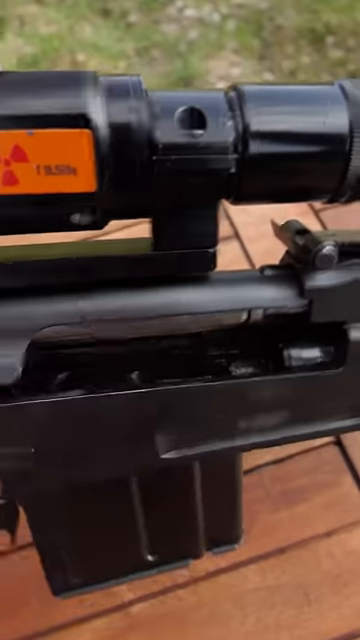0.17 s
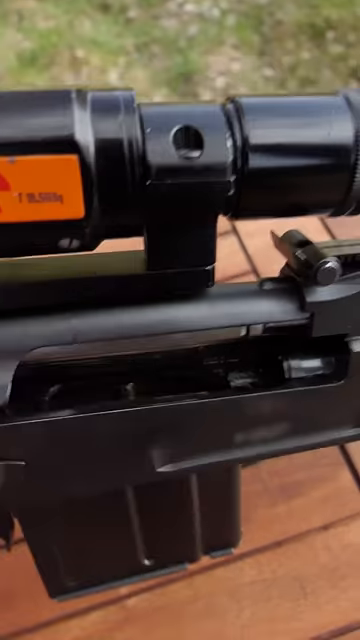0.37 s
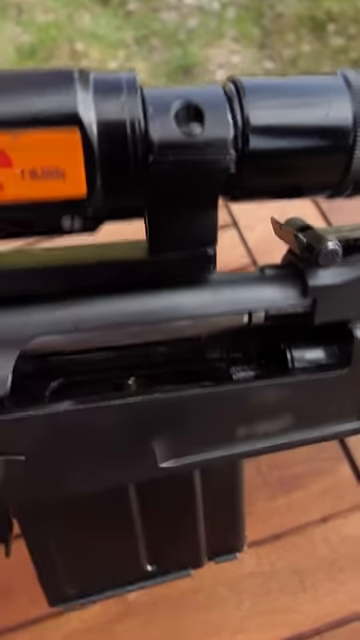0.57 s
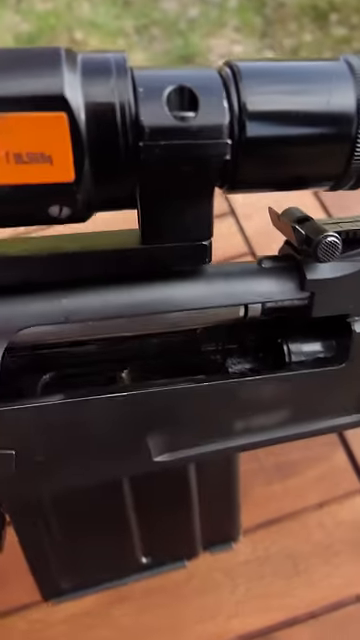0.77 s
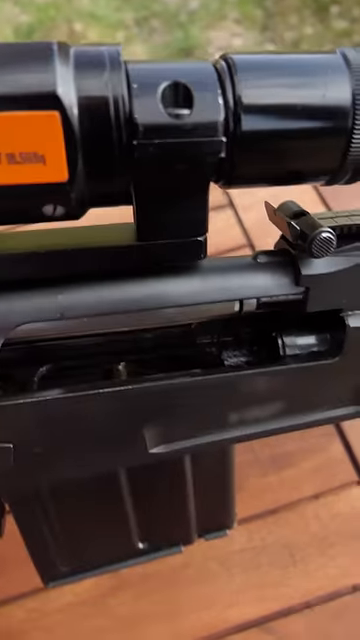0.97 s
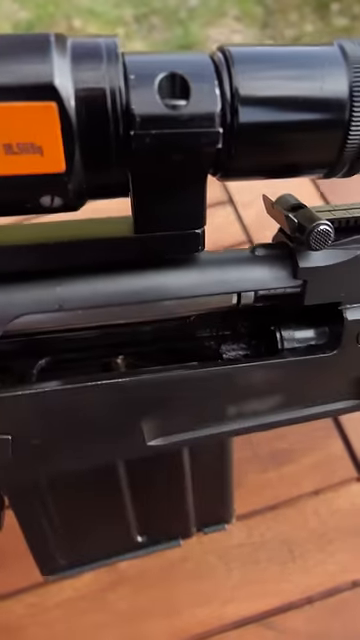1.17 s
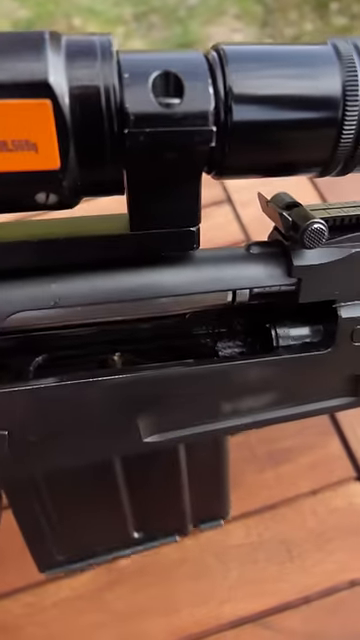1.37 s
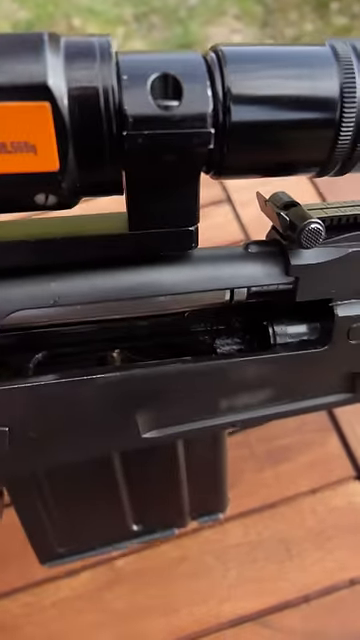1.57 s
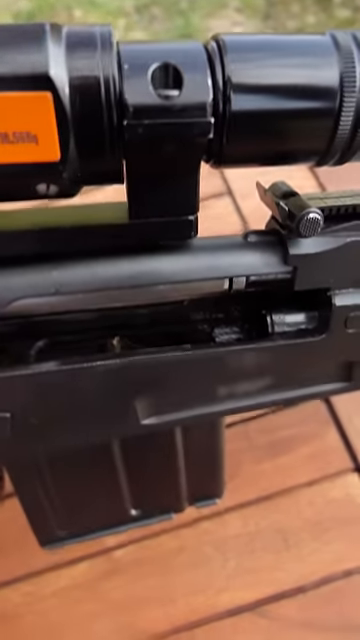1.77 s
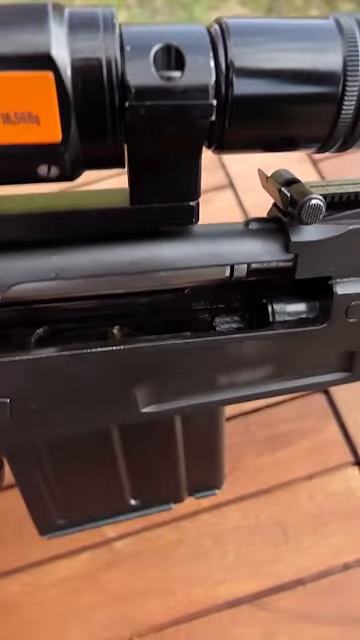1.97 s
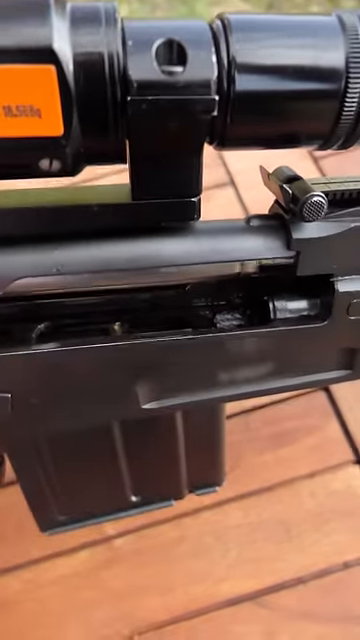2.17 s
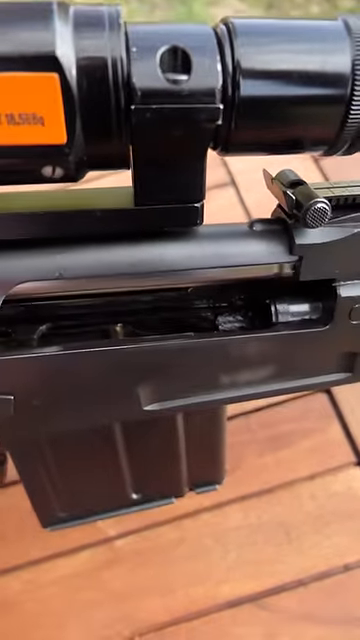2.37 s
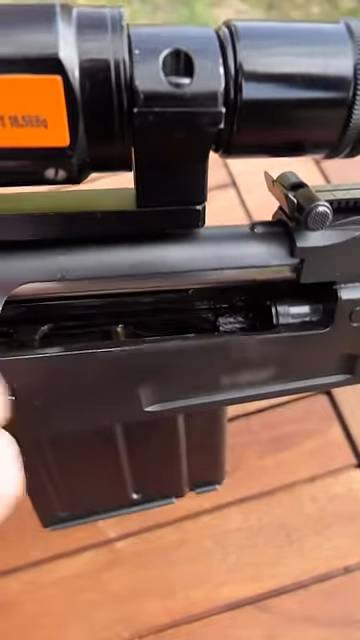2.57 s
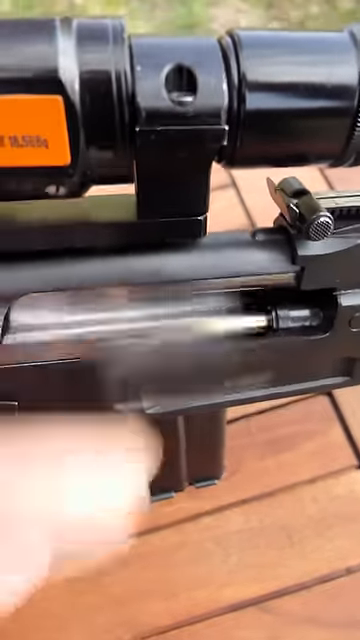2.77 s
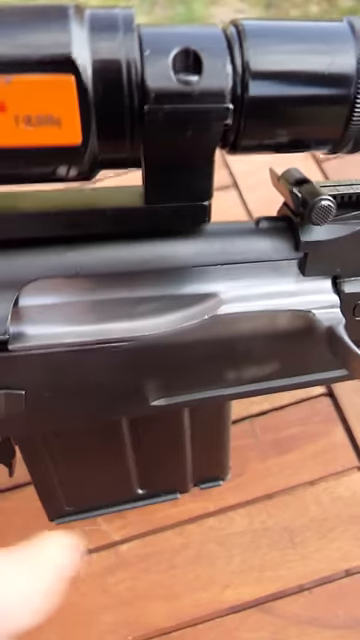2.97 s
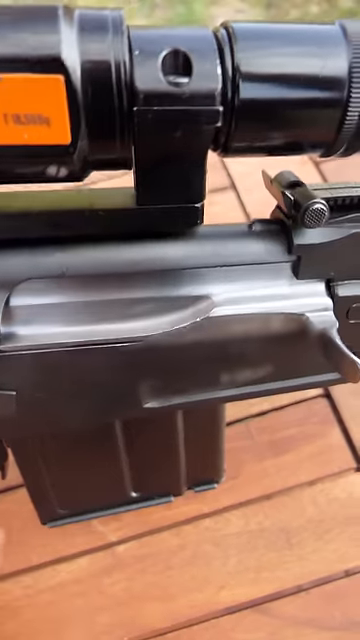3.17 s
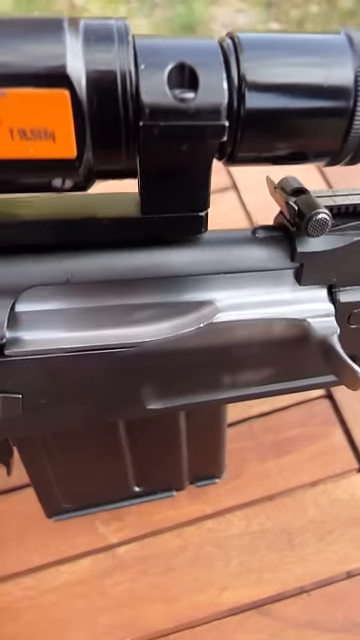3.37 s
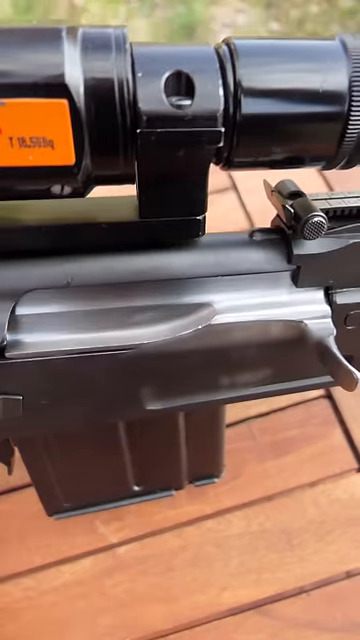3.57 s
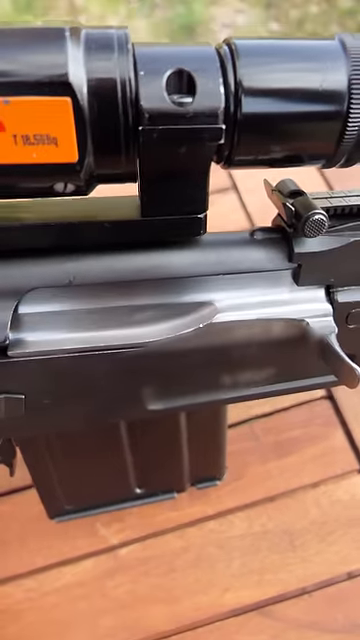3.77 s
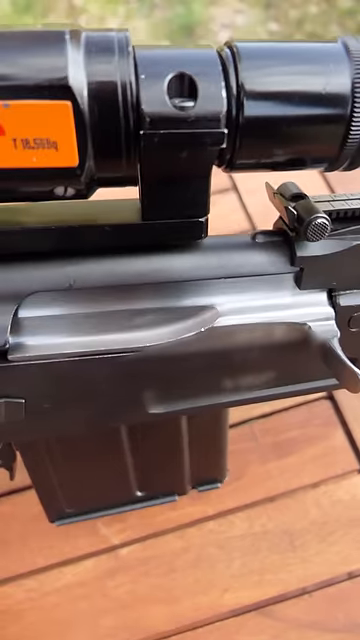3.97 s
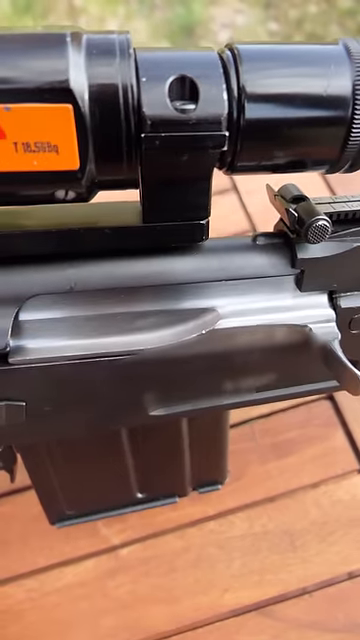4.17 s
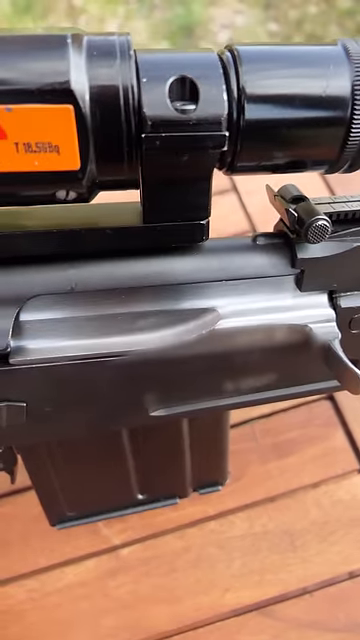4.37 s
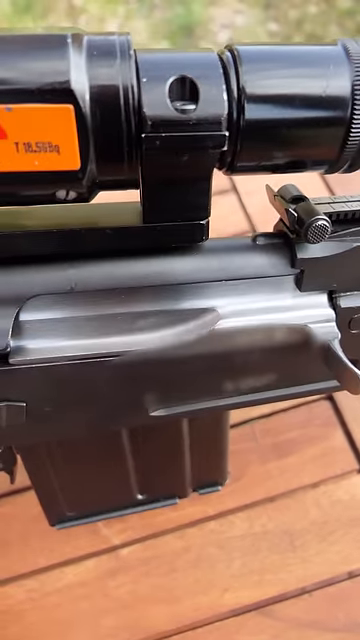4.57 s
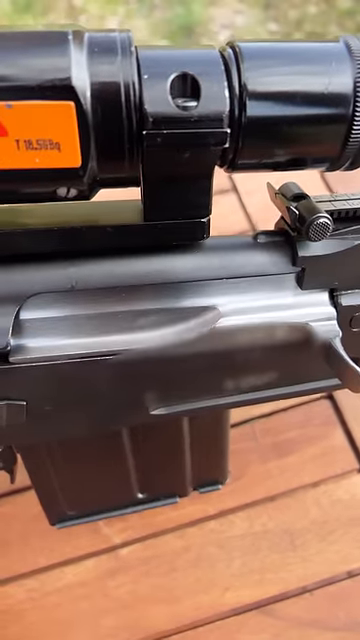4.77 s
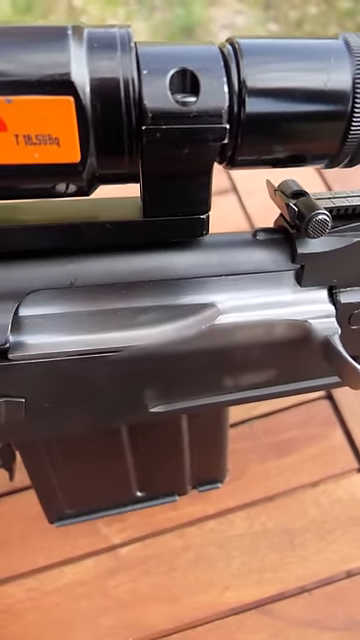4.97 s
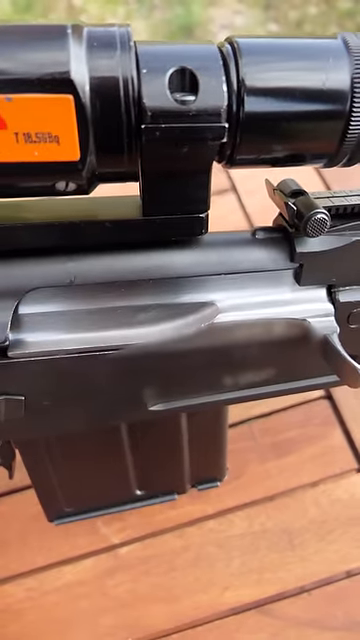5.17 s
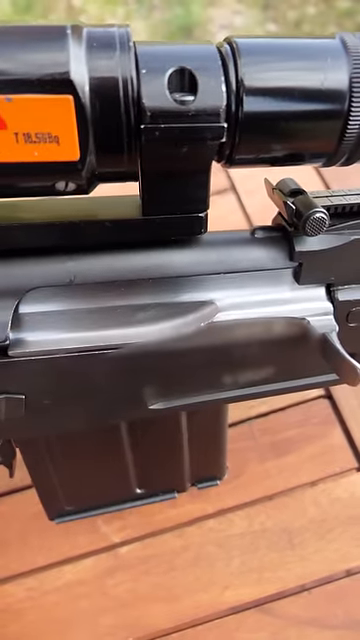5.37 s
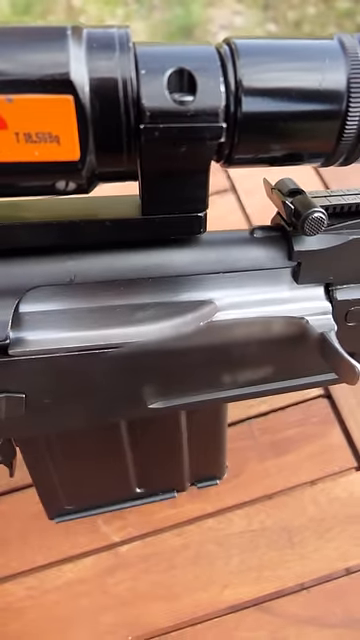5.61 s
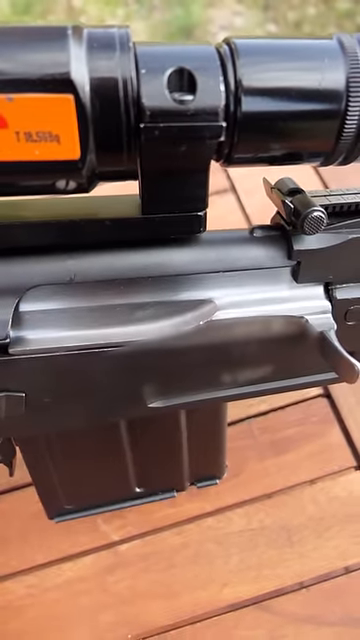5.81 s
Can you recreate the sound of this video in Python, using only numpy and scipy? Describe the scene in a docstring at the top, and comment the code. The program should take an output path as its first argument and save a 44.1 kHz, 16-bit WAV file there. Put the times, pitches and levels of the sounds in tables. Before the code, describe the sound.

Close steel scraping and a hard clack, a quiet pause, then a bolt rasps forward, chambers a round and bangs closed.

```python
"""A rifle bolt scrapes and slams close by, the rifle lying on a wooden garden table: drawn back against
the stop, later gripped and let go, it rubs over the magazine, strips a cartridge and slams shut.
Contacts are noise bursts plus receiver modes; rubbing is random slips through resonances; brass pings,
carrier, frame and table are fading modes. Two spring modes sing on faintly, over a weak scattered echo,
a light breeze and low swells of coloured noise, and a far bird and one faint blip of gliding sines."""
import sys
import numpy as np
from scipy import signal
from scipy.fft import rfft, irfft, next_fast_len
from scipy.io import wavfile
from scipy.ndimage import uniform_filter1d, minimum_filter1d, map_coordinates

SR = 44100
rng = np.random.default_rng(int(sys.argv[2]) if len(sys.argv) > 2 else 0)


def generate_wav(signal):
    """Clip the signal to [-1, 1] and save it as 16-bit WAV at the path in sys.argv[1]."""
    frames = np.transpose(np.atleast_2d(signal))
    scaled = np.clip(frames, -1, 1) * 32767
    pcm = np.round(scaled).astype(np.int16)
    wavfile.write(sys.argv[1], SR, pcm)


N = 257632
TIME = np.arange(N) / SR


def amp(db):
    """Decibels to amplitude."""
    return 10 ** (np.asarray(db) / 20)


def unit(x):
    """Scale to rms 1."""
    return x / np.sqrt(np.mean(x ** 2) + 1e-20)


def along(points, hz):
    """Interpolate (f/Hz, value) points on a log frequency axis."""
    f, value = np.transpose(points)
    return np.interp(np.log(hz + 1), np.log(f + 1), value)


def curves(rows):
    """One value per sample for each column after the time."""
    s, *columns = np.transpose(rows)
    return [np.interp(TIME, s, column) for column in columns]


def during(rows):
    """1 while a curve lasts, with soft ends."""
    to_nearest_end = np.minimum(TIME - rows[0][0], rows[-1][0] - TIME)
    return np.clip(to_nearest_end / 0.0027, 0, 1)


def wobble(knots_per_s):
    """Random curve, linear between normal knots."""
    knots = rng.standard_normal(int(N * knots_per_s / SR) + 4)
    return map_coordinates(knots, [TIME * knots_per_s], order=1)


def filtered(x, response):
    """Apply a complex response of frequency."""
    size = next_fast_len(len(x) + 8192)
    spectrum = rfft(x, size) * response(np.fft.rfftfreq(size, 1 / SR))
    return irfft(spectrum, size)[:len(x)]


def noise(spectrum, size):
    """Coloured noise of rms 1."""
    return unit(filtered(rng.standard_normal(size), lambda hz: amp(along(spectrum, hz))))


def ring(modes, t, scatter_db):
    """Sum of fading sines, at new random strengths and phases for every blow."""
    out = 0
    for hz, db, t60 in modes:
        level = amp(db + scatter_db * rng.normal() - 60 * t / t60)
        out = out + level * np.sin(2 * np.pi * (hz * t + rng.random()))
    return out


def add(track, s, x):
    """Mix x into the track at s seconds."""
    part = track[max(round(s * SR), 0):][:len(x)]
    part += x[:len(part)]


def struck(events, modes):
    """A part rings freely after each (t/s, level/dB) blow."""
    out, t = np.zeros(N), np.arange(SR) / SR
    onset = 1 - np.exp(-t / 0.0015)
    for s, db in events:
        add(out, s, amp(db) * ring(modes, t, scatter_db=0.5) * onset)
    return out


# breeze level before its swing: [t/s, level/dB]
BREEZE_LEVEL = [(0, -63), (1.0, -62), (1.3, -65), (3.5, -67.5), (4.8, -63.5), (5.2, -58), (5.84, -58)]
# breeze spectrum: [f/Hz, relative density/dB]
BREEZE_SPECTRUM = [(24, -39.5), (40, -10), (70, 1), (108, -1.5), (193, -2.5), (293, -5), (368, -4),
                   (521, -7.5), (643, -5), (850, -13.5), (1210, -13.5), (1620, -26), (2600, -35.5),
                   (3380, -59.5), (5720, -120)]
# low rumbling swells at the microphone, from wind or handling: [t/s, level/dB]
LOW_SWELLS = [(0.72, -53.5), (2.5, -49.5)]
# low rumble spectrum: [f/Hz, relative density/dB]
RUMBLE_SPECTRUM = [(10, -4.5), (28, -1.5), (45, -15), (90, -31), (200, -70)]
# hiss spectrum: [f/Hz, relative density/dB]
HISS_SPECTRUM = [(300, -23), (1500, 2), (4000, -4), (7000, -10.5)]
BREEZE_SWING_DB, BREEZE_KNOTS_PER_S = 1.8, 6
LOW_SWELL_HALF_S, LOW_FLOOR_DB, HISS_DB = 0.31, -59.5, -72.5  # half-length to 1/e


def air():
    """Unsteady breeze noise, low rumble with swells, steady hiss."""
    breeze_db, = curves(BREEZE_LEVEL)
    breeze_db = breeze_db + BREEZE_SWING_DB * wobble(BREEZE_KNOTS_PER_S)
    breeze = amp(breeze_db) * noise(BREEZE_SPECTRUM, N)
    low_gain = amp(LOW_FLOOR_DB)
    for s, db in LOW_SWELLS:
        low_gain = low_gain + amp(db) * np.exp(-((TIME - s) / LOW_SWELL_HALF_S) ** 2)
    return breeze + low_gain * noise(RUMBLE_SPECTRUM, N) + amp(HISS_DB) * noise(HISS_SPECTRUM, N)


# far bird's whistles, and one faint short knock-like blip at 4.85 s; one list each,
# before waver and blur: [t/s, f/Hz, level/dB]
WHISTLES_AND_BLIP = [
    [(1.88, 1870, -80), (1.96, 1790, -66.5), (1.99, 1517, -71), (2.07, 1230, -64), (2.12, 1270, -65)],
    [(4.36, 1136, -65), (4.43, 1400, -70), (4.54, 1435, -72), (4.62, 1180, -70)],
    [(4.82, 910, -85), (4.855, 889, -57), (4.89, 882, -80)],
    [(5.19, 1555, -68), (5.23, 1360, -66), (5.29, 1115, -78)],
]
PITCH_WAVER = .02  # share of the pitch


def bird_and_blip():
    """Gliding sines, blurred by a random quadrature part."""
    out = np.zeros(N)
    for glide in WHISTLES_AND_BLIP:
        hz, db = curves(glide)
        phase = 2 * np.pi * np.cumsum(hz * (1 + PITCH_WAVER * wobble(35))) / SR
        tone = np.sin(phase) + wobble(100) * np.cos(phase)
        out += during(glide) * amp(db) * tone
    return out


# echo decay: [f/Hz, t60/s]
ECHO_DECAY = [(100, 0.98), (500, 0.95), (2000, 0.44), (7000, .5)]


def garden(x):
    """Fence and shrubs scatter an echo: x through slow-onset noise with decay set by frequency."""
    hz, t, z = signal.stft(rng.standard_normal(SR), SR, nperseg=256)
    decay = amp(-60 * t / along(ECHO_DECAY, hz)[:, None])
    tail = signal.istft(z * decay, SR, nperseg=256)[1]
    tail *= 1 - np.exp(-np.arange(len(tail)) / SR / .015)
    return signal.fftconvolve(x, tail / np.linalg.norm(tail))[:N]


# two close modes of the recoil spring: [f/Hz]
SPRING_MODES_HZ = (3000, 3031)
# slams that set it singing, peak levels: [t/s, lower mode/dB, upper mode/dB]
SPRING_SWELLS = [(0.2, -89, -72), (2.93, -58, -66)]
SING_PEAK_S, SING_SHARPNESS = .9, 3.8  # slam to peak; higher is narrower


def spring():
    """Two recoil-spring modes swell slowly after a slam, beat and fade."""
    out = np.zeros(N)
    for s, *levels_db in SPRING_SWELLS:
        age = np.maximum(TIME - s, 0) / SING_PEAK_S
        swell = (age * np.exp(1 - age)) ** SING_SHARPNESS
        for hz, db in zip(SPRING_MODES_HZ, levels_db):
            out += swell * amp(db) * np.sin(2 * np.pi * hz * TIME + .12 * wobble(40))
    return out


def jolt():
    """The slam pushes air at the microphone, which swings back slowly through its bass cut."""
    since = np.maximum(TIME - 2.9089, 0)

    def hump(peak_s):
        return since / peak_s * np.exp(1 - since / peak_s)

    push = amp(-19.3) * hump(.092) - amp(-11.5) * hump(.011)
    bass_cut = signal.butter(2, .73, 'highpass', fs=SR, output='sos')
    return signal.sosfilt(bass_cut, push)


# rifle kicks the table: [t/s, level/dB]
TABLE_KICKS = [(0.053, -25.5), (0.203, -30.5), (2.33, -37.5), (2.768, -30), (2.909, -22), (2.932, -20),
               (3.004, -35.5)]
# wooden table modes: [f/Hz, relative level/dB, t60/s]
TABLE_MODES = [(67, -3.5, 0.12), (86, -5, 0.21), (105, -1.5, .09), (176, -1.5, 0.14), (235, -3, 0.057)]


def table():
    """Kicked table top sounds its low, short modes."""
    return struck(TABLE_KICKS, TABLE_MODES)


# blow at the rear stop: [t/s, level/dB]
STOP_BLOWS = [(0.204, -41.5)]
# long modes of the whole rifle: [f/Hz, relative level/dB, t60/s]
FRAME_MODES = [(483, 0, 1.0), (3270, -19, 1.05), (6480, -18, .38), (6925, -24, .4)]


def frame():
    """Held open, the whole rifle rings on in long modes."""
    return struck(STOP_BLOWS, FRAME_MODES)


# high brass pings that hold, then stop short: [t/s, level/dB, length/s]
BRASS_PINGS = [(0.225, -42, .14), (0.587, -56, .065), (2.186, -58, .03), (2.473, -39, .08)]
# brass modes: [f/Hz, relative level/dB, t60/s until the stop]
BRASS_MODES = [(3252, 0.5, 0.051), (4743, -5, 0.62)]
STOP_DECAY_S = .006


def brass_pings():
    """High brass pings, each cut off after its length."""
    out, t = np.zeros(N), np.arange(SR // 2) / SR
    onset = 1 - np.exp(-t / 0.0015)
    for s, db, length_s in BRASS_PINGS:
        cutoff = np.exp(-np.maximum(t - length_s, 0) / STOP_DECAY_S)
        add(out, s, amp(db) * ring(BRASS_MODES, t, scatter_db=3.0) * onset * cutoff)
    return out


# bolt travels: [start t/s, swell/s, end t/s, rumble level/dB, scrape level/dB, speed 0-1]
BOLT_STROKES = [(-0.15, 0.23, 0.21, -24.5, -33, .78), (2.12, 0.18, 2.47, -28, -41, .28),
                (2.535, 0.056, 2.63, -31.5, -47.5, 0.2), (2.64, 0.1, 2.9, -24, -26.5, .85)]
SWELL_DB, GRIP_S = 21.5, .03  # growth over the swell; fade-in
RELEASE_DB_PER_S, SCRAPE_GROWS_DB = 269.5, 14  # decay after a stroke; scrape growth over it
CLOSED_S = 2.932  # bolt home
RATTLE_DB, RATTLE_T60_S, SURGE_HZ, SURGE_DB = -36.5, .62, 27, 5


def bolt_speed(s):
    """Stroke speed (0-1) at s seconds, interpolated between strokes."""
    times = [edge for start, _, end, *_ in BOLT_STROKES for edge in (start, end)]
    return np.interp(s, times, np.repeat([stroke[-1] for stroke in BOLT_STROKES], 2))


def rubbing():
    """Rumble and scrape gains: strokes swell, hold, release; coil surges pulse the spring's last rattle."""
    rumble = scrape = 0
    for start, swell, end, rumble_db, scrape_db, _ in BOLT_STROKES:
        swell_db = SWELL_DB * np.clip(1 - (TIME - start) / swell, 0, 1)
        release_db = RELEASE_DB_PER_S * np.maximum(TIME - end, 0)
        gain = np.clip((TIME - start) / GRIP_S, 0, 1) * amp(-swell_db - release_db)
        to_go = np.clip((end - TIME) / (end - start), 0, 1)
        rumble = rumble + gain * amp(rumble_db)
        scrape = scrape + gain * amp(scrape_db - SCRAPE_GROWS_DB * to_go ** 2)
    since = np.maximum(TIME - CLOSED_S, 0)
    surge_db = SURGE_DB * np.cos(2 * np.pi * SURGE_HZ * since)
    rattle = (since > 0) * amp(RATTLE_DB - 60 * since / RATTLE_T60_S - surge_db)
    return rumble, np.hypot(scrape, rattle)


def slips(per_s):
    """Steel catching and slipping: random tiny impacts of uneven size."""
    hits = rng.random(N) < per_s / SR
    return hits * rng.uniform(-1, 1, N) * amp(3 * wobble(110))


# rail resonances, each filter run twice: [f/Hz, width of one pass/Hz, relative level at half speed/dB]
RAIL_RESONANCES = [(84, 70, -15), (228, 83, -3), (337, 110, -5), (480, 140, 0), (664, 230, -3),
                   (742, 220, -5.5), (830, 160, -15), (1180, 190, -11.5)]
# steel slip spectrum: [f/Hz, relative density/dB]
SCRAPE_SPECTRUM = [(500, -34), (1000, -1), (1500, 7.5), (2000, 0.5), (2600, 5.5), (3600, -2.5), (5000, -9),
                   (7000, -36.5)]


def slide():
    """Slips shake the rails and rattle the spring; a faster bolt favours higher resonances."""
    speed = bolt_speed(TIME)
    rub, body, power = slips(per_s=2700), 0, 0
    for fc, width, db in RAIL_RESONANCES:
        gain = amp(db + 11 * (speed - .5) * np.log2(fc / 450))
        resonance = filtered(rub, lambda f: (1j * f * width / (fc * fc - f * f + 1j * f * width)) ** 2)
        body = body + gain * unit(resonance)
        power = power + gain ** 2
    body = body / np.sqrt(power)
    # short steel ring per slip, duller when the bolt creeps
    t = np.arange(SR // 10) / SR
    slip_ring = noise(SCRAPE_SPECTRUM, len(t)) * amp(-60 * t / 0.0073)
    bright = unit(signal.fftconvolve(slips(per_s=800), slip_ring)[:N])
    dull = unit(filtered(bright, lambda hz: 1 / (1 + (hz / 2800) ** 4)))
    brightness = np.clip(2 * speed, 0, 1)
    grit = brightness * bright + (1 - brightness) * dull
    rumble, scrape = rubbing()
    return rumble * body + scrape * grit


# carrier hits a stop or rebounds: [t/s, clack level/dB, body re clack/dB, carrier ring level/dB]
CARRIER_SLAMS = [(0.2015, 3.5, -6, -1), (0.2226, -11, -9.5, 1), (2.6083, -2, -1.5, -13),
                 (2.827, -3, -2.5, -23.5), (2.9083, 1.5, -14, -25.5), (2.9331, -2, -8.5, 0),
                 (3.004, -19, 0.5, -40)]
# carrier modes: [f/Hz, relative level/dB, t60/s]
CARRIER_MODES = [(2360, -9.5, 0.051), (2397, -3, 0.033)]


def carrier():
    """Bolt carrier rings briefly after each slam."""
    return struck([(s, ring_db) for s, _, _, ring_db in CARRIER_SLAMS], CARRIER_MODES)


# bolt catches hammer, magazine lips, cartridge: [t/s, clack level/dB, thud re clack/dB]
BOLT_CATCHES = [(0.0105, -27.5, -5.5), (0.052, -16.5, 0), (0.087, -29, -4), (0.108, -18.5, -5.5),
                (0.1135, -12.5, -11), (0.136, -14.5, -7.5), (0.145, -16.5, -3.5), (0.1636, -11, -10),
                (2.327, -17, 0), (2.354, -22.5, 7), (2.434, -18.5, 0), (2.463, -16, -6.5),
                (2.511, -31.5, -9.5), (2.5853, -14.5, -9.5), (2.636, -28.5, 4), (2.684, -26, -6.5),
                (2.7185, -13.5, -6.5), (2.7662, -13, -1), (2.787, -13, -13.5), (2.7938, -11, -9),
                (2.8013, -7.5, -4.5), (2.8789, -17.5, -12.5)]
# loose parts tick at rest: [t/s, level/dB]
LOOSE_TICKS = [(0.547, -48.5), (0.568, -43.5), (0.585, -48.5), (2.184, -39.5), (3.253, -51), (4.391, -56),
               (4.85, -67), (4.93, -51.5), (5.4555, -40), (5.5047, -49.5), (5.542, -48.5), (5.572, -50)]
SLAM_THUD_DB, SLAM_EDGE_DB, SLAM_RISE_S, SLAM_CHATTER_S = -7, -4.5, .0004, 0.01  # thud re body
CATCH_KNOCK_DB, CATCH_EDGE_DB, CATCH_RISE_S = 1, -13, .0016  # at half speed
KNOCK_DB_PER_SPEED, EDGE_DB_PER_SPEED, CATCH_CHATTER_S = 11, 15.5, 0.013
TICK_THUD_DB, TICK_KNOCK_DB, TICK_EDGE_DB = -2.5, 0.5, -19.5
TICK_RISE_S, TICK_CHATTER_S = .0004, 0.0036


def contacts():
    """Steel contacts: t/s, clack/dB, thud, knock, edge re clack/dB, rise/s, chatter/s; fast is brighter."""
    rows = []
    for s, db, body_db, _ in CARRIER_SLAMS:
        rows.append((s, db, body_db + SLAM_THUD_DB, body_db, SLAM_EDGE_DB, SLAM_RISE_S, SLAM_CHATTER_S))
    for s, db, thud_db in BOLT_CATCHES:
        faster = bolt_speed(s) - .5
        knock_db = CATCH_KNOCK_DB + KNOCK_DB_PER_SPEED * faster
        edge_db = CATCH_EDGE_DB + EDGE_DB_PER_SPEED * faster
        rise_s = CATCH_RISE_S * np.exp(-2 * faster)
        rows.append((s, db, thud_db, knock_db, edge_db, rise_s, CATCH_CHATTER_S))
    for s, db in LOOSE_TICKS:
        rows.append((s, db, TICK_THUD_DB, TICK_KNOCK_DB, TICK_EDGE_DB, TICK_RISE_S, TICK_CHATTER_S))
    return rows


# receiver and magazine modes: [f/Hz, relative level/dB, t60/s before damping]
RECEIVER_MODES = [(247.3, -4, 0.19), (466.5, -0.5, .14), (655, 0, 0.095), (723, 2.5, 0.15), (776, -6, .1),
                  (1138, -5, .08), (1345, 0.5, 0.063), (1468, -5, 0.24), (1693, 3, 0.05), (1950, -2, 0.076),
                  (2150, -2.5, 0.03), (2372, -1, 0.059), (2643, -3, .07), (2700, -7, 0.042),
                  (3250, -8, .07), (3290, -10, 0.058), (3760, -10, .06), (4040, -8.5, 0.052),
                  (4900, -10.5, .06), (5400, -9, 0.038), (6330, -20, 0.067)]
# receiver's dense small modes: [f/Hz, relative density/dB]
CLACK_SPECTRUM = [(47, -38), (80, -12.5), (146, -19), (332, -5.5), (688, -3), (1020, -5.5), (2070, -4),
                  (2320, -5), (2850, -7.5), (5810, -16.5), (7000, -24), (9100, -59.5), (15400, -120)]
REGISTERS_HZ = [(100, 550), (550, 1100), (1100, 3000), (3000, 9000)]
HELD_T60_S, LOOSE_T60_S = 0.75, 0.085  # damping by hand and table; loose parts


def clacks():
    """Each contact rings the receiver; where and how hard it lands weights four registers."""
    out, t = np.zeros(N), np.arange(SR // 4) / SR
    filters = [signal.butter(3, edges, 'bandpass', fs=SR, output='sos') for edges in REGISTERS_HZ]
    for s, db, thud_db, knock_db, edge_db, rise_s, chatter_s in contacts():
        # faces chatter, then loose parts ring out
        fade = 1 / (1 + (t / chatter_s) ** 4) + amp(-60 * t / LOOSE_T60_S)
        modes = ring(RECEIVER_MODES, t, scatter_db=4.0) * amp(-60 * t / HELD_T60_S)
        blow = noise(CLACK_SPECTRUM, len(t)) * fade + .5 * modes
        blow *= 1 - np.exp(-t / max(rise_s, .0002))
        weights_db = (thud_db + 2.5, knock_db, -1.2, edge_db - 2.5)
        for sos, weight_db in zip(filters, weights_db):
            part = signal.sosfilt(sos, blow)
            strength = 2.5 * np.sqrt(np.mean(part[t < .012] ** 2))
            add(out, s, amp(db + weight_db) * part / strength)
    return out


def scene():
    """The rifle and its echo in the garden."""
    rings = carrier() + brass_pings() + frame() + table()
    rifle = clacks() + slide() + rings
    echo = amp(-36) * garden(rifle)
    return (rifle + echo + jolt() + spring() + bird_and_blip() + air())[None]


BAND_HZ, TOP_HZ = 7300, 16000


def record(dry):
    """Narrow-band microphone path; a fast limiter squeezes the hardest blows and their tips still clip."""
    narrow = filtered(dry[0], lambda hz: 1 / np.sqrt(1 + (hz / BAND_HZ) ** 120))
    needed = np.minimum(1, 1.13 / (np.abs(narrow) + 1e-9))
    gain = uniform_filter1d(minimum_filter1d(needed, size=90), size=90)
    clipped = np.clip(narrow * gain, -1, 1)
    return filtered(clipped, lambda hz: hz < TOP_HZ)[None]


dry = scene()
out = record(dry)
generate_wav(out)
```